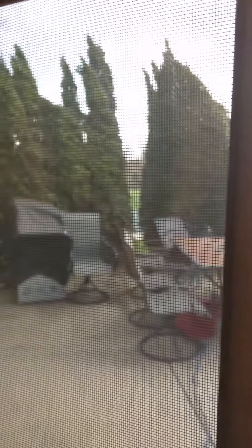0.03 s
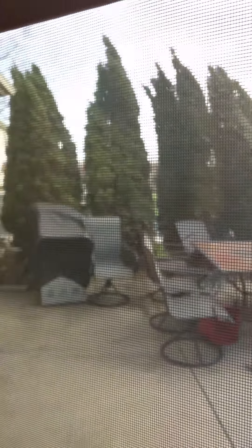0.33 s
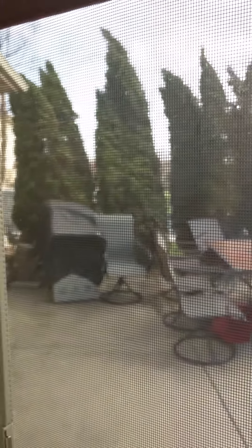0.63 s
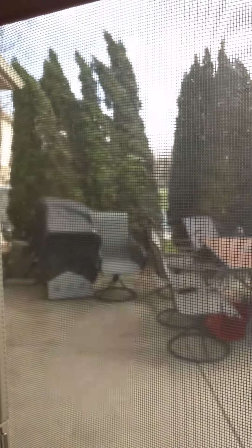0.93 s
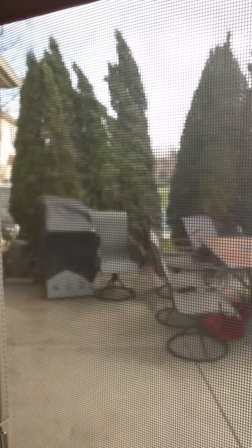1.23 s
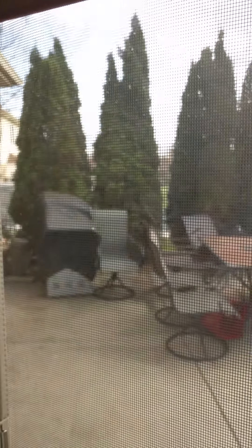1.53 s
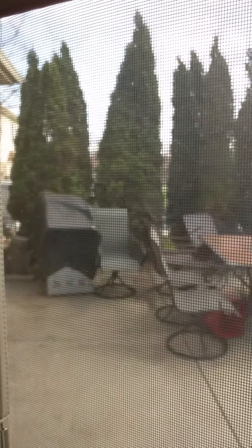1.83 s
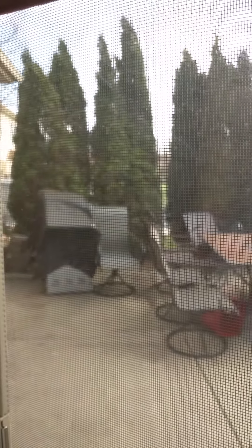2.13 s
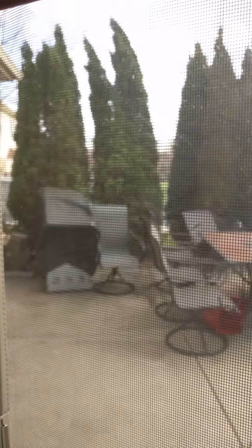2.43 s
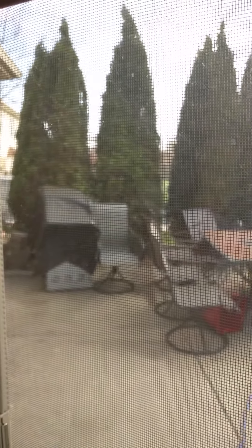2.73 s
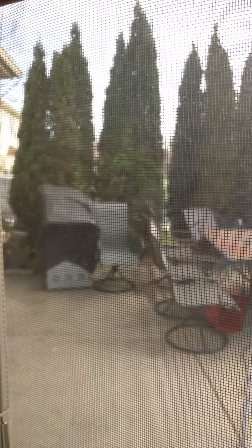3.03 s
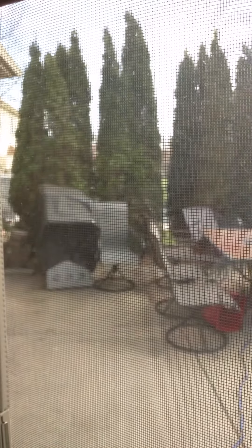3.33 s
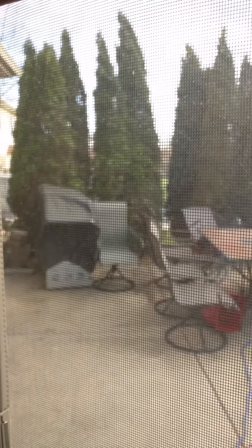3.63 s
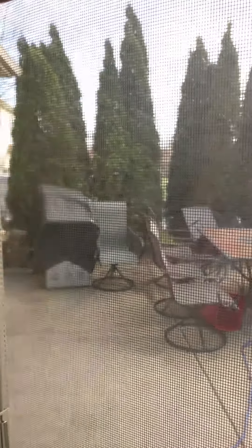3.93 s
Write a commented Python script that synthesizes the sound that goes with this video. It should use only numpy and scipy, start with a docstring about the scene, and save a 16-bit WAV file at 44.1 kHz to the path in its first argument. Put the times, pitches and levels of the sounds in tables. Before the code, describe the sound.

Strong wind roars through tall evergreens and rushes through a patio screen throughout, with low buffeting on the microphone, a faint moan and a steady hiss. The gusts swell at about 1 second, stay strong from 1.9 to 3.2, then ease. Faint handling ticks come around 0.4, 1.4 and 2 seconds, and one light, dull knock sounds at about 3.4 seconds.

```python
"""Strong wind rushes through the screen of a patio, its turbulence exciting fixed resonances.
Behind it a row of tall evergreens roars. Eddies buffet the microphone, and the sheltered corner
drones, with a faint moan and a steady hiss. The hand holding the microphone makes a few small
ticks and rubs, and one dull knock sounds near the end."""
import sys
import numpy as np
from scipy import signal
from scipy.fft import rfft, irfft
from scipy.io import wavfile

SR = 44100
rng = np.random.default_rng(int(sys.argv[2]) if len(sys.argv) > 2 else 0)


def unload_wav(signal):
    """Save mono or channel-first audio to the path in sys.argv[1] as 16-bit WAV at rate SR, clipped to [-1, 1]."""
    wavfile.write(
        sys.argv[1],
        SR,
        np.round(np.clip(np.atleast_2d(signal).T, -1, 1) * 32767).astype(np.int16),
    )


N = 176400
TIME = np.arange(N) / SR
BIN_HZ = np.maximum(np.arange(N // 2 + 1) * SR / N, 1)

# Spectrum of the hiss. Each row: frequency in Hz, relative density in dB.
HISS_SPECTRUM = [(1000, 3.5), (6000, 3), (9000, 3), (12000, 3), (15500, 2.5)]
# Low resonances of the corner. Each row: centre in Hz, width in Hz, level in dB.
CORNER_MODES = [(100, 44, -55.5), (168.5, 13.7, -59.5), (390, 8.5, -69.5)]
# Envelope of the moan. Each row: time in seconds, level in dB.
MOAN_LEVEL = [(0,-84),(.3,-51.5),(.6,-66.5),(1.3,-66.5),(1.75,-55.5),(2.05,-66.5),(2.5,-52),(2.8,-63.5),(3.05,-61),(3.4,-66.5),(4,-58)]
# Ticks of the hand. Each row: start in seconds, level in dB, centre in Hz, width in Hz, decay in seconds.
HAND_TICKS = [(0.271, -54.5, 3800, 3000, 0.0076), (.275, -60, 9500, 4000, 0.0074),
              (.349, -57, 12000, 5000, .005), (.349, -49, 2020, 700, 0.0039),
              (.457, -47, 3800, 2000, 0.0023), (.4585, -48, 11800, 5000, 0.0023),
              (0.479, -52, 11000, 4000, 0.002), (1.3935, -50, 12500, 4000, 0.00084),
              (1.396, -38, 13600, 1300, .002), (1.395, -43, 11900, 3000, .0015),
              (1.945, -47.5, 4000, 1500, 0.0034), (1.9644, -45, 6800, 5000, 0.0016),
              (1.9683, -43, 12000, 5000, .002), (1.9775, -55, 10500, 4000, .003)]
# Rubs of the hand. Each row: middle and half length in seconds, level in dB, centre and width in Hz.
HAND_RUBS = [(.208, 0.029, -61, 5400, 450), (.38, 0.61, -75, 5440, 600), (.48, 0.045, -71, 10500, 3000),
             (0.485, .05, -72, 3200, 1200), (1.98, 0.036, -63, 11100, 6000), (3.6, .04, -72, 11000, 5000)]
# Modes rung by the knock. Each row: frequency in Hz, level in dB, decay in seconds.
KNOCK_PARTIALS = [(1750, -34.5, .008), (1960, -37.5, .004)]
# Strength of the eddies at the microphone. Each row: time in seconds, relative level in dB.
EDDY_STRENGTH = [(0,0),(0.25,-3),(0.55,-.5),(1.0,-4.5),(1.17,1.5),(1.32,-7.5),(1.5,-1),(1.9,0),(2.15,-2.5),(2.6,-1.5),(3.15,-5),(3.4,-2.5),(3.7,-4),(4.0,-5.5)]
# Spectrum of the buffeting. Each row: frequency in Hz, relative density in dB.
BUFFET_SPECTRUM = [(4, -4), (11, -4.5), (27, -0.5), (46, -5), (65, -12.5), (110, -17.5), (145, -23),
                   (250, -27), (600, -38), (2000, -91)]
# Swell of the roar in the trees. Each row: time in seconds, relative level in dB.
FOLIAGE_SWELL = [(0, -2), (0.75, -0.6), (1.7, -2.0), (2.0, -0.5), (2.25, -2), (2.45, 0.5), (2.95, -0.8),
                 (3.25, -2), (3.6, -5.5), (4.0, -5.5)]
# Spectrum of that roar. Each row: frequency in Hz, relative density in dB.
FOLIAGE_SPECTRUM = [(90, 4), (200, 0), (320, 0), (480, -4), (700, -3.5), (1100, -3), (1600, -7),
                    (2200, -15.5), (2700, -19.5), (3600, -27), (7000, -35), (15000, -35.5)]
# Strength of the gust at the screen. Each row: time in seconds, relative level in dB.
GUST_STRENGTH = [(0,-8.5),(0.2,-5.5),(0.5,-3),(0.6,-4),(0.66,-2.2),(0.8,-2.5),(0.93,-6.5),(1.03,-4.5),(1.045,.3),(1.27,-.2),(1.35,-2.5),(1.5,-1.7),(1.85,-3.2),(1.89,1.7),(2.12,-.7),(2.45,0),(2.6,-1.8),(2.85,0),(3.2,-.8),(3.45,-6.5),(3.63,-11.5),(3.75,-6),(4.0,-11)]
# Resonances of the air rushing through the screen.
# Each row: centre in Hz, width in Hz, level in dB at a gust of 0 dB, growth in dB per dB of gust.
SCREEN_MODES = [(1387, 236, -56, 0.8), (1713, 160, -52, 1.0), (1770, 61, -55.5, 1.2),
                (1728, 334, -50.5, 1.0), (1900, 105, -54, 1.5), (2097, 150, -57.5, .8),
                (2410, 1000, -65.5, 1.2), (4164, 260, -63.5, 1.35), (4570, 270, -64, 1.5),
                (5030, 490, -66.5, 1.1), (6340, 500, -74.5, 2.5), (8010, 470, -75.5, 1.55),
                (11200, 2000, -74, 0.5)]


def from_db(db):
    """Amplitude grows tenfold for every 20 dB."""
    return 10 ** (np.asarray(db) / 20)


def unit_power(x):
    """Division by the root mean square gives unit power."""
    return x / np.sqrt(np.mean(x ** 2) + 1e-20)


def envelope(rows):
    """Linear interpolation gives a value at every sample."""
    return np.interp(TIME, *np.transpose(rows))


def noise(gain):
    """Filtering weights each frequency of white noise; the result has unit power."""
    return unit_power(irfft(rfft(rng.standard_normal(N)) * gain, N))


def coloured(spectrum):
    """Spectral shaping: noise follows a curve in dB over log frequency."""
    hz, db = np.transpose(spectrum)
    return noise(from_db(np.interp(np.log(BIN_HZ), np.log(hz), db)))


def resonant(hz, width_hz):
    """Two resonators in cascade give a steep-sided noise band of the given half-power width."""
    detune = (BIN_HZ ** 2 - hz ** 2) / (BIN_HZ * width_hz)
    return noise(1 / (1 + (np.sqrt(2) - 1) * detune ** 2))


def drift(corner_hz):
    """Low-pass noise is a slow random fluctuation of unit spread."""
    return noise(1 / (1 + (BIN_HZ / corner_hz) ** 2))


def hiss(level_db=-67):
    """Stationary broadband noise is heard as an even hiss."""
    return from_db(level_db) * coloured(HISS_SPECTRUM)


def corner_drone(waver_db=2):
    """Resonance in the sheltered corner picks out low bands, each wavering independently."""
    return sum(from_db(db - waver_db * drift(1.8)) * resonant(hz, width) for hz, width, db in CORNER_MODES)


def wind_moan(pitch_hz=263.5, wander_hz=3.55, waver_db=1.5):
    """Random modulation of frequency and amplitude turns a pure tone into the wind's faint moan."""
    phase = 2 * np.pi * np.cumsum(pitch_hz + wander_hz * drift(7.3)) / SR
    return from_db(envelope(MOAN_LEVEL) + waver_db * drift(19)) * unit_power(np.sin(phase))


def handling(attack_s=0.00026, tail_db=-27, tail_s=0.025):
    """Contacts of the hand give ticks that decay exponentially; its friction gives soft swells of noise."""
    out = np.zeros(N)
    for start, db, hz, width, decay in HAND_TICKS:
        age = np.maximum(TIME - start, 0)
        rise = 1 - np.exp(-age / attack_s)
        fall = np.exp(-age / decay) + from_db(tail_db) * np.exp(-age / tail_s)
        out += from_db(db) * rise * fall * resonant(hz, width)
    for middle, half_length, db, hz, width in HAND_RUBS:
        swell = np.exp(-((TIME - middle) / half_length) ** 2)
        out += from_db(db) * swell * resonant(hz, width)
    return out


def knock(start_s=3.381, attack_s=0.0006):
    """Damped free vibration: one light, soft blow rings two short modes."""
    age = np.maximum(TIME - start_s, 0)
    ring = sum(from_db(db) * np.exp(-age / decay) * np.sin(2 * np.pi * hz * age)
               for hz, db, decay in KNOCK_PARTIALS)
    return (1 - np.exp(-age / attack_s)) * ring


def buffeting(level_db=-35.5, lumps_db=1.0):
    """Pressure fluctuations of eddies on the microphone make a lumpy rumble."""
    gain = from_db(level_db + envelope(EDDY_STRENGTH) + lumps_db * drift(30))
    return gain * coloured(BUFFET_SPECTRUM)


def tree_roar(level_db=-47.5, flicker_db=0.96):
    """Airflow through evergreen foliage radiates broadband noise that swells and sinks."""
    gain = from_db(level_db + envelope(FOLIAGE_SWELL) + flicker_db * drift(4.1))
    return gain * coloured(FOLIAGE_SPECTRUM)


def screen_rush(flicker_db=1.07, flicker_hz=17):
    """Turbulence excites fixed resonances, each growing as its own power of the gust strength."""
    gust_db = envelope(GUST_STRENGTH)
    return sum(from_db(db + growth * gust_db + flicker_db * drift(flicker_hz)) * resonant(hz, width)
               for hz, width, db, growth in SCREEN_MODES)


def scene():
    """Superposition: the pressures of all sources add at one microphone."""
    background = hiss() + corner_drone() + wind_moan() + handling() + knock()
    return (background + buffeting() + tree_roar() + screen_rush())[None]


def record(dry, cutoff_hz=15750):
    """An elliptic low-pass filter cuts the highest treble steeply."""
    return signal.sosfilt(signal.ellip(12, .1, 70, cutoff_hz, fs=SR, output="sos"), dry)


dry = scene()
out = record(dry)
unload_wav(out)
```